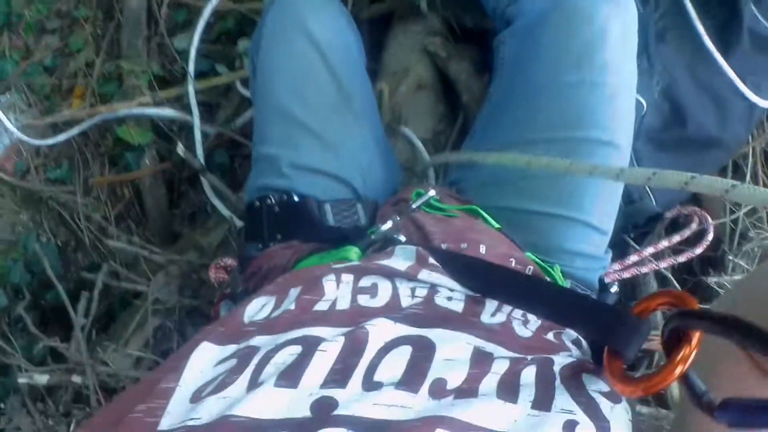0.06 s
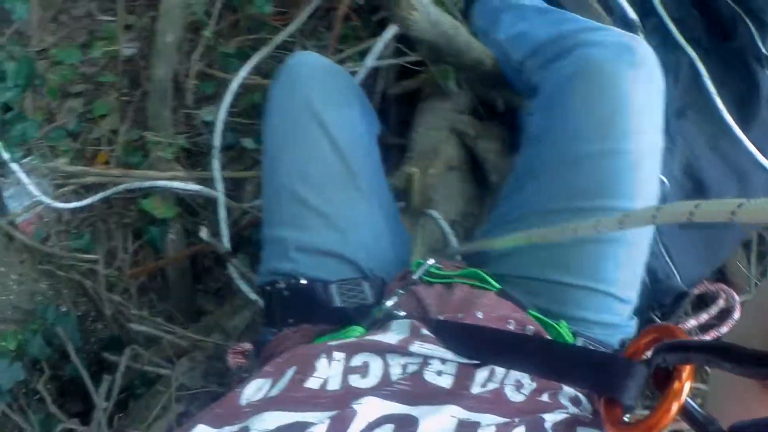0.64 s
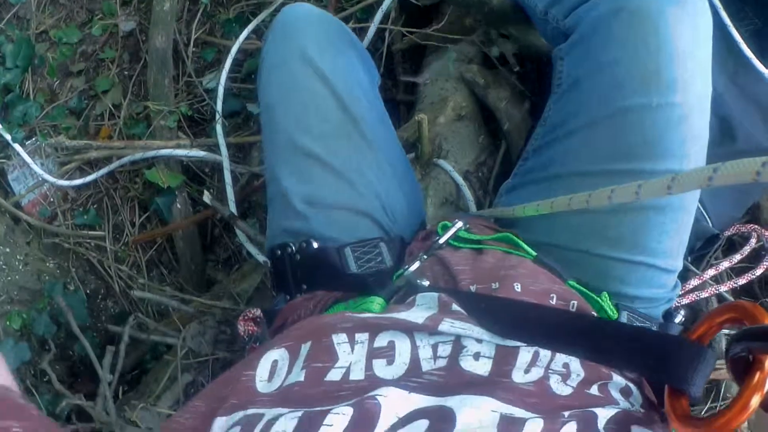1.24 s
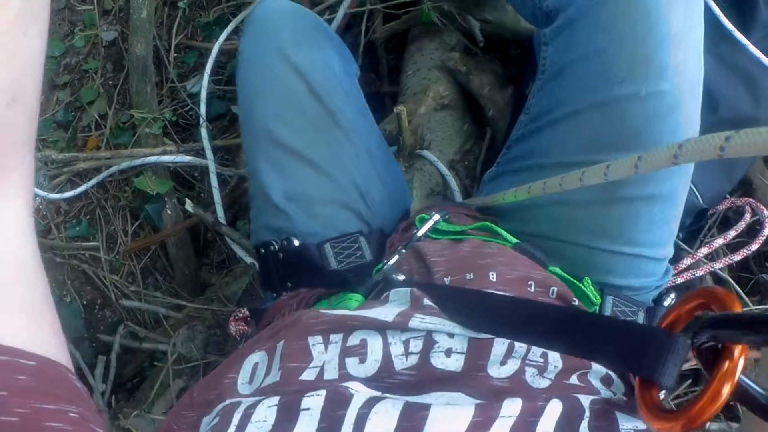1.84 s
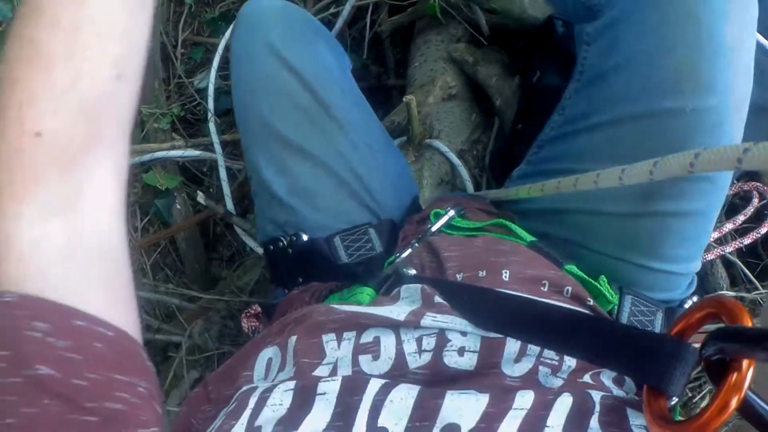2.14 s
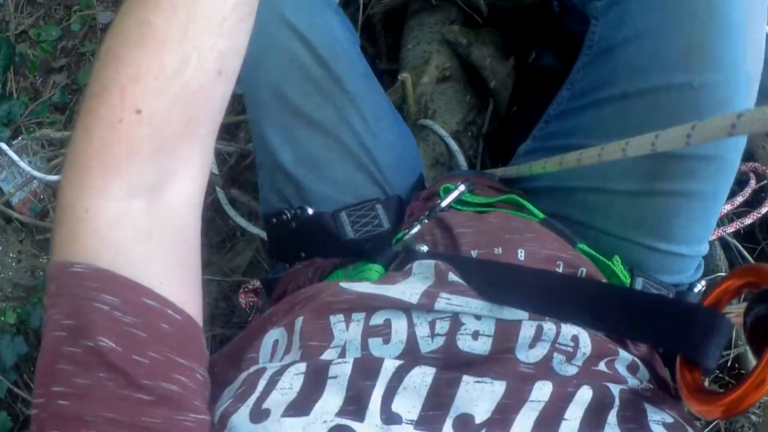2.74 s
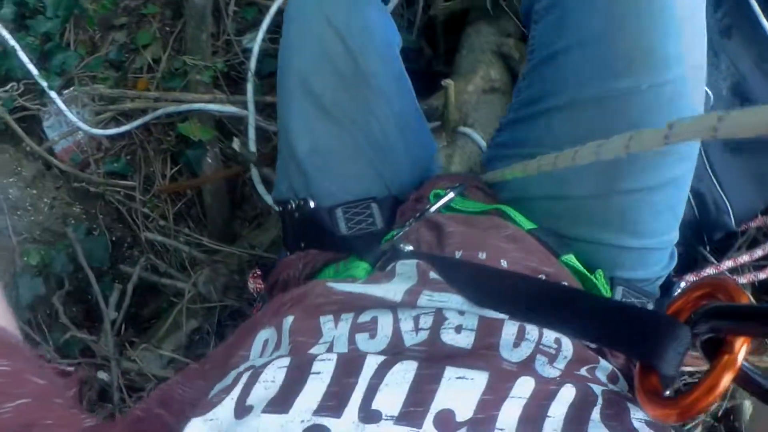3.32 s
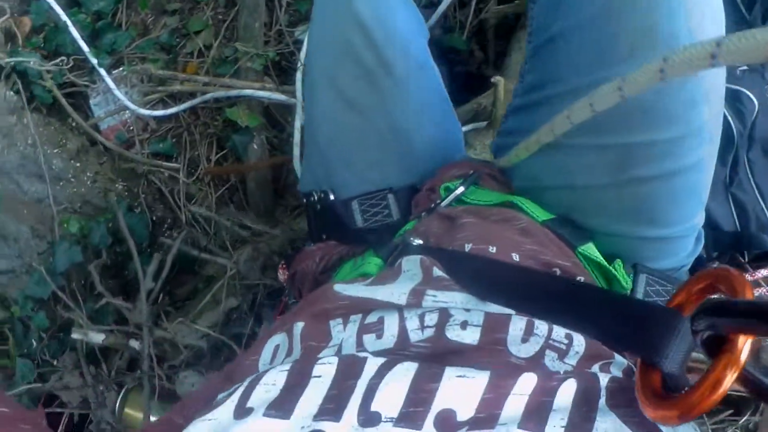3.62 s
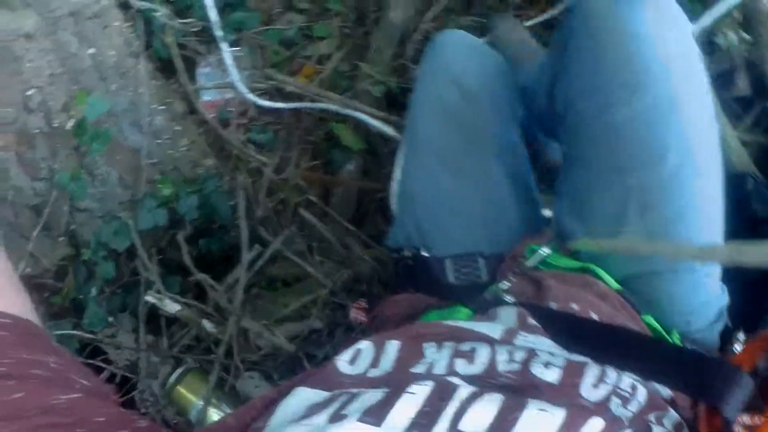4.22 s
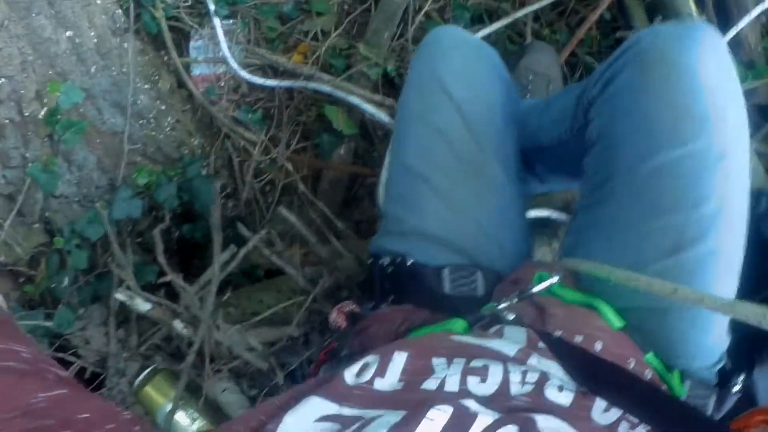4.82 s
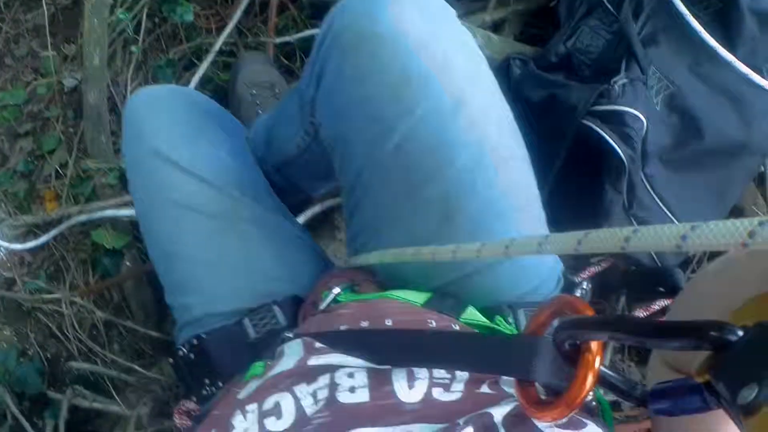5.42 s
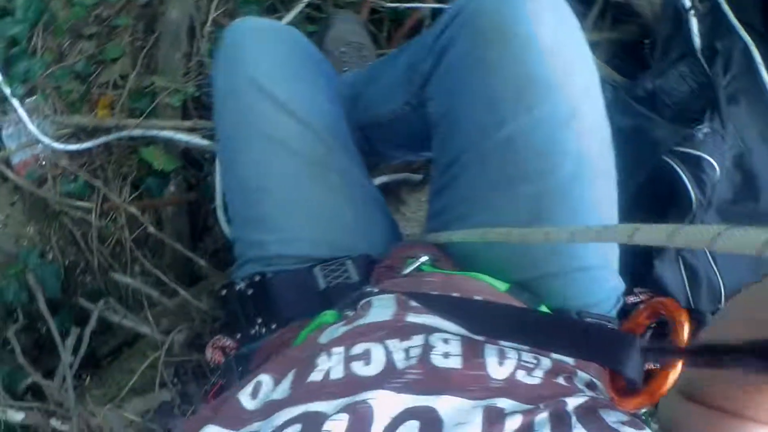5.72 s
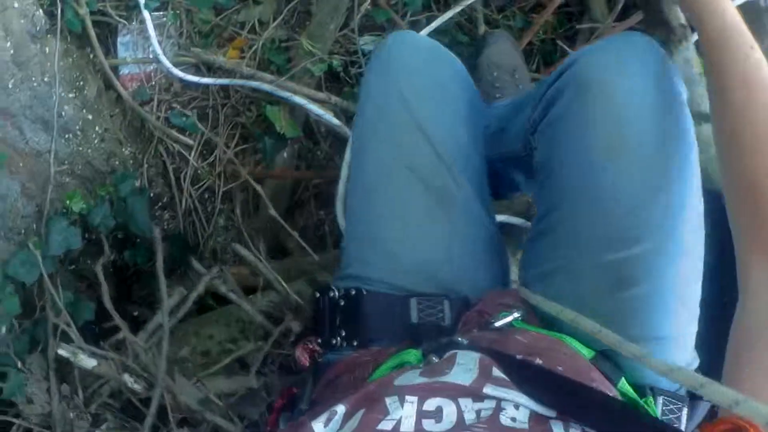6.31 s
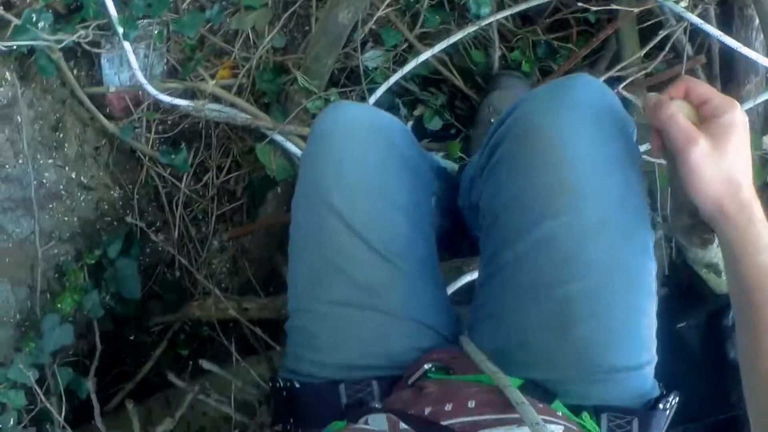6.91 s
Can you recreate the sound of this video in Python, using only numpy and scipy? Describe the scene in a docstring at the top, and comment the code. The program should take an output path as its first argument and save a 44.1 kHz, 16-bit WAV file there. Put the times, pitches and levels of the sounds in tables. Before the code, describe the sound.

Irregular rustling and rope scuffing with sharp metal clicks and hollow knocks, as a climber's gear bumps a body-worn microphone.

```python
"""Climber handling gear

A climber shifts about on a rope in a quiet wood, heard from a body-worn camera in a plastic case.
Each shift of weight sways the mount and rubs cloth. Karabiners click and ping, gear knocks, and rope
and webbing scuff and zip: impact and friction excite the damped modes of the case. Straps creak,
feet stir ivy and twigs, and the hardest knocks overload the microphone."""
import sys
import numpy as np
from scipy import signal
from scipy.fft import rfft, irfft
from scipy.io import wavfile
from scipy.ndimage import uniform_filter1d

SR = 44100
rng = np.random.default_rng(int(sys.argv[2]) if len(sys.argv) > 2 else 0)


def dump(signal):
    """Clip the signal to [-1, 1] and save it as 16-bit WAV at the path in sys.argv[1]."""
    limited = np.clip(np.atleast_2d(signal).T, -1, 1)
    pcm = np.round(limited * 32767).astype(np.int16)
    wavfile.write(sys.argv[1], SR, pcm)


N = 311346

# Levels in the tables are taken before each source's gain.
# modes of the camera case: frequency_hz, t60_s, level_db
CASE_MODES = [(78.5, 0.046, -8.5), (162.7, 0.086, -6.5), (256, 0.052, 2.5), (324.3, 0.086, -7),
              (439.6, 0.1, -15), (610, 0.025, -10), (787.6, 0.054, -2.5), (1144, 0.029, 0),
              (1277.5, 0.082, 5), (1359, 0.04, 5.5), (1548.6, 0.038, 12.5), (1665, 0.09, -13.5),
              (1892, 0.044, -1.5), (2135, 0.028, -1.5), (2350, 0.029, -6.5), (2670, 0.044, -17),
              (3120, 0.0091, -3), (3423, 0.012, 1.5), (3706, 0.051, -9), (4228, 0.015, 10),
              (4300, 0.09, -29), (4700, 0.03, 4), (5200, .02, -31), (6160, 0.0206, -26), (6800, 0.0033, 3),
              (7350, 0.0067, 3)]
# registers of the case (thud, shell ring, edge, glint): low_hz, high_hz
REGISTERS = [(55, 665), (800, 1820), (2100, 3350), (5200, 8900)]
# spectrum of the microphone's noise: frequency_hz, relative_density_db
NOISE_SPECTRUM = [(15, -27), (25, 7), (86, -2), (148, -8.5), (274, -6.5), (378, -10), (509, -9),
                  (1020, -17), (1270, -5.5), (1570, -25), (1950, -20.5), (5140, -25.5), (10400, -28),
                  (15500, -31.5)]
# shifts of the climber's weight: start_s, length_s, cloth_db, sway_db
WEIGHT_SHIFTS = [(0, 0.063, -42.5, -35), (0.165, 0.49, -40, -36), (.68, 0.1, -50, -37.5),
                 (1.11, 0.55, -43.5, -40.5), (1.702, 0.074, -53, -40), (2.05, 0.32, -42.5, -32.5),
                 (2.458, 0.16, -38, -31), (2.76, 0.12, -44, -37.5), (3.021, 0.042, -40.5, -38),
                 (3.265, .28, -42.5, -31.5), (3.76, .17, -34.5, -29), (4.016, .13, -36.5, -31),
                 (4.364, 0.34, -35, -26), (4.716, .23, -40.5, -38), (5.074, .16, -35.5, -25.5),
                 (5.27, 0.48, -45.5, -41.5), (6.099, 0.071, -40, -33), (6.67, 0.2, -46, -47.5)]
# spectrum of the swaying mount: frequency_hz, relative_density_db
SWAY_SPECTRUM = [(15, -43), (25, -4.5), (70, 4.5), (199, 0.5), (300, 3), (375, -12.5), (498, -3.5),
                 (584, -22), (764, -14.5), (881, -9), (1100, -48.5), (1430, -28), (2420, -120)]
# spectrum of rubbing cloth: frequency_hz, relative_density_db
CLOTH_SPECTRUM = [(240, -31), (400, -2), (1040, -9.5), (1600, 1.5), (1990, -13), (2380, -8.5), (2720, -18),
                  (7000, -36), (9100, -64), (15400, -120)]
# the body bumping the mount, and the low thud under the gear knock at 3.82 s: start_s, sway_db, thud_db
BUMPS = [(0.049, -30.5, -33), (.208, -15, -23.5), (.24, -22, -26), (0.312, -25, -19), (.984, -56, -36),
         (2.017, -53, -32), (2.177, -31.5, -28), (3.414, -30, -21), (3.824, -50, -18.5), (4.111, -24, -28),
         (4.34, -27, -20), (4.59, -22, -22.5), (5.19, -21, -25.5), (6.722, -41, -35.5), (6.957, -45, -36.5)]
# karabiners and buckles clicking: start_s, level_db, brightness_db, chatter_s
CLICKS = [(0.063, -34, -12, 0.0027), (0.153, -58.5, 25.5, .004), (0.27, -23.5, 12.5, 0.0036),
          (.31, -18, 8, 0.0052), (.322, -20.5, 4, .007), (.333, -16.5, 6, 0.0073),
          (.352, -19.5, 0.5, 0.011), (.372, -25.5, 3.5, 0.0062), (0.579, -25, 2.5, 0.0041),
          (0.904, -22, -8.5, 0.0013), (2.499, -24, 0.5, 0.0052), (3.411, -20.5, 0, 0.0075),
          (5.082, -27, 16.5, 0.0068), (5.138, -15, -9.5, 0.0058), (5.27, -24.5, -8.5, 0.0044),
          (5.33, -33, -7, .005), (5.821, -40, 1.5, 0.0022), (5.882, -49.5, 2, 0.003),
          (5.947, -45, 4.5, 0.0039), (6.031, -24, 8, 0.0087), (6.594, -53.5, 17, 0.0025)]
# tone of a click, a row per register: offset_db, db_per_brightness_db
CLICK_TONE = [(-7.5, 0.5), (0, 0), (-3, 0.5666), (-22, 1.5041)]
# rope and webbing scuffing: start_s, level_db, brightness_db, second_slip_delay_s (0 for none)
SCUFFS = [(.172, -23.5, -4.5, 0.027), (.339, -22, 11, 0.00013), (0.386, -20, 4.5, 0.00029),
          (.434, -23.5, 6.5, 0), (.536, -31, 18, 0), (.591, -21.5, 3, 0.0055), (.778, -36, -6, 0),
          (1.184, -27.5, -1, .028), (1.622, -31.5, -0.5, 0), (1.885, -43.5, -14, 0.0004),
          (2.172, -28.5, 1.5, 0.025), (2.336, -22, 3, 0.016), (2.646, -30.5, -0.5, 0),
          (2.765, -21, -7.5, 0.014), (2.992, -36, -18, 0), (3.049, -31.5, -4, 0.00052),
          (3.188, -43, 7.5, 0), (3.278, -34, -8, 0.0019), (3.347, -37, -7, 0), (3.509, -24.5, 3, .018),
          (3.984, -25.5, 0.5, 0), (4.104, -29.5, -9, 0.0023), (4.378, -29, 2.5, 0), (4.586, -31, 3, 0),
          (4.73, -21, 5, .041), (4.962, -34, -1.5, 0), (5.045, -26, 6.5, 0.00091),
          (5.092, -17, -7.5, 0.011), (5.163, -23.5, -8, 0.011), (5.391, -36.5, 0, 0), (5.592, -49, 13, 0),
          (5.718, -39.5, 6, 0), (6.1, -23, -17, 0.022), (6.335, -29, -1.5, 0.025)]
# tone of a slip, a row per register: offset_db, db_per_brightness_db
SLIP_TONE = [(-6.5, -0.21), (0, 0), (-10.5, 1), (-32, 0.5)]
# struck karabiners ringing: start_s, pitch_hz, level_db
PINGS = [(0.269, 7950, -36), (0.322, 7880, -33), (0.906, 4280, -41), (3.411, 4164, -27),
         (5.083, 7040, -27.5), (5.165, 4200, -40), (6.032, 7060, -26)]
# feet stirring ivy and dry twigs: start_s, level_db, time_constant_s
RUSTLES = [(.315, -55, 0.017), (5.086, -42, 0.042), (6.481, -52, 0.01), (6.633, -45.5, 0.011),
           (6.661, -54, 0.079)]
# longer pulls of rope over cloth: start_s, length_s, level_db, brightness_db
DRAGS = [(0.477, .1, -26, 4), (1.108, 0.25, -39.5, -14), (1.173, .09, -30.5, 2.5), (2.552, 0.12, -35, -7),
         (2.807, 0.13, -38.5, -3.5), (4.402, .18, -27.5, -2), (4.706, 0.041, -27.5, 6.5),
         (5.115, 0.089, -25, -1)]
# gear hitting the case: start_s, sway_db, thud_db, ring_db, edge_db, glint_db, chatter_s, hardness_hz
KNOCKS = [(2.724, -29, -11.5, -6.5, -19, -36, 0.0084, 3000),
          (3.8229, -36, -15, -15.5, -27.5, -46, 0.016, 400), (4.0322, -11.5, 2, -21, -34, -61, 0.0051, 197),
          (4.181, -6.5, -0.5, -11.5, -25.5, -40, 0.0065, 300),
          (5.646, -51, -22, -24, -14.5, -37, 0.00078, 1497),
          (6.0734, -24, -9.5, -2.5, -2, -35, 0.0046, 5000), (6.084, -25, -15.5, -6, -36, -42, 0.0044, 3010)]
# the rope's woven sheath running through the gear: start_s, length_s, top_pitch_hz, level_db
ZIPS = [(3.628, 0.33, 544, -37), (4.32, 0.31, 821, -41), (4.718, 0.29, 797, -42)]
# webbing creaking under load: start_s, length_s, pitch_hz, level_db
CREAKS = [(4.319, 0.029, 366, -29), (4.586, 0.032, 775, -26), (6.529, 0.01, 500, -40.5)]

T = np.arange(int(.25 * SR)) / SR  # seconds since the start of one contact
LEAD_S = .005  # a brief noisy swell just before each click or knock


def undb(db):
    """Amplitude grows tenfold with every 20 dB."""
    return 10 ** (np.asarray(db) / 20)


def unit(x):
    """Division by the rms gives a signal unit power."""
    return x / np.sqrt(np.mean(x ** 2))


def burst_level(x, db):
    """A transient's level is set as the rms of its strongest 20 ms."""
    power = uniform_filter1d(x ** 2, SR // 50, mode="constant")
    return x * undb(db) / np.sqrt(power.max())


def band(x, lo_hz, hi_hz, order=3):
    """A causal band-pass attenuates frequencies beyond its two edges."""
    return signal.sosfilt(signal.butter(order, [lo_hz, hi_hz], "band", fs=SR, output="sos"), x)


def colour(x, spectrum):
    """Spectral weighting colours a noise; the result has unit power."""
    hz, db = np.transpose(spectrum)
    bin_hz = np.maximum(np.arange(N // 2 + 1) * SR / N, 1)
    gain = undb(np.interp(np.log(bin_hz), np.log(hz), db))
    return unit(irfft(rfft(x) * gain, N))


def wander(rate_hz):
    """Smoothed random steps form a slow fluctuation of unit power."""
    hold = int(SR / rate_hz)
    steps = rng.standard_normal(N // 100)[:N // hold + 1]
    return unit(uniform_filter1d(np.repeat(steps, hold), hold)[:N])


def add(out, start_s, x):
    """Superposition: x adds to the sound already present."""
    i = max(int(start_s * SR), 0)
    out[i:i + len(x)] += x[:max(N - i, 0)]


def grit(n, spread_db):
    """Friction is a run of tiny slips, mostly small and a few large."""
    size = np.clip(rng.standard_normal(n), -3, 3)
    return unit(rng.standard_normal(n) * undb(spread_db * size))


def case_ring(detune, crack_db=3, crack_s=0.0034):
    """The case's impulse response: damped modes, shifted by where it is touched, and a dense crack."""
    hz, t60_s, db = np.transpose(CASE_MODES)[:, :, None]
    hz = hz * (1 + detune * rng.standard_normal(hz.shape))
    polarity = rng.choice([-1, 1], hz.shape)
    modes = polarity * undb(db - 60 * T / t60_s) * np.sin(2 * np.pi * hz * T)
    crack = undb(crack_db) * np.exp(-T / crack_s) * rng.standard_normal(len(T))
    return modes.sum(axis=0) + crack


def contact(force, levels_db, detune):
    """Forced response: the force is convolved with the case's ring, then each register gets its level."""
    response = signal.fftconvolve(force, case_ring(detune))[:len(T)]
    return sum(burst_level(band(response, lo, hi), db) for (lo, hi), db in zip(REGISTERS, levels_db))


def register_levels(tone, db, bright_db):
    """Spectral balance: brightness raises edge and glint against the shell ring."""
    offset_db, slope = np.transpose(tone)
    return db + offset_db + slope * bright_db


def impact_force(chatter_s, impulse, swell_s=0.0014):
    """After a brief noisy swell, colliding parts exchange an impulse at LEAD_S and chatter to rest."""
    age_s = T - LEAD_S
    time_constant_s = np.where(age_s < 0, swell_s, chatter_s)
    force = grit(len(T), 3.96) * np.exp(-np.abs(age_s) / time_constant_s)
    force[int(LEAD_S * SR)] += impulse
    return force


def microphone_noise(hiss_db=-46, whine_hz=10200, whine_db=-71):
    """Self-noise is stationary: a broadband murmur and hiss, with a faint narrowband whine."""
    whine = unit(band(rng.standard_normal(N), whine_hz - 250, whine_hz + 250, order=1))
    hiss = colour(rng.standard_normal(N), NOISE_SPECTRUM)
    return hiss * undb(hiss_db) + whine * undb(whine_db)


def shift_envelopes(attack_s=0.05, cloth_release_s=0.03, sway_release_s=0.076):
    """Each shift of weight builds, holds and decays exponentially; the mount outlasts the cloth."""
    t = np.arange(N) / SR
    rubbing, swaying = undb(-53), undb(-60)  # at rest
    for start_s, length_s, cloth_db, sway_db in WEIGHT_SHIFTS:
        onset = np.exp(-np.maximum(start_s - t, 0) / attack_s)
        after_s = np.maximum(t - start_s - length_s, 0)
        rubbing = np.maximum(rubbing, undb(cloth_db) * onset * np.exp(-after_s / cloth_release_s))
        swaying = np.maximum(swaying, undb(sway_db) * onset * np.exp(-after_s / sway_release_s))
    return rubbing, swaying


def sway_and_cloth(sway_gain_db=-2, patchy_db=4, band_drift_db=2):
    """Uneven grip modulates the amplitude of the mount's rumble and the cloth's fine crackle."""
    rubbing, swaying = shift_envelopes()
    grip = undb(patchy_db * wander(rate_hz=60))
    sway = colour(grit(N, spread_db=5.4) * grip, SWAY_SPECTRUM)
    # coarse folds and fine fibres rub separately, so each band swells and fades by itself
    edges_hz = np.geomspace(400, 6400, 5)
    cloth = 0
    for lo, hi in zip(edges_hz, edges_hz[1:]):
        rub = colour(grit(N, spread_db=9) * grip, CLOTH_SPECTRUM)
        cloth += band(rub, lo, hi, order=2) * undb(band_drift_db * wander(rate_hz=14))
    return sway * swaying * undb(sway_gain_db) + unit(cloth) * rubbing


def mount_swing(db, hz=80, t60_s=0.13):
    """Pushed once, the case on its mount moves as a damped oscillator."""
    return burst_level(undb(-60 * T / t60_s) * np.sin(2 * np.pi * hz * T), db)


def body_bumps(gain_db=-1):
    """A soft push swings the mount and excites only the low modes of the case."""
    out = np.zeros(N)
    for start_s, sway_db, thud_db in BUMPS:
        thud = burst_level(band(case_ring(detune=0.203), 162, 422), thud_db)
        add(out, start_s, mount_swing(sway_db) + thud)
    return out * undb(gain_db)


def karabiner_clicks(gain_db=-1):
    """Loaded metal snaps into place, damped by the rope; so brief a force excites a wide band."""
    out = np.zeros(N)
    for start_s, db, bright_db, chatter_s in CLICKS:
        force = impact_force(chatter_s, impulse=1.7, swell_s=0.0011)
        levels_db = register_levels(CLICK_TONE, db, bright_db)
        add(out, start_s - LEAD_S, contact(force, levels_db, detune=0.0527))
    return out * undb(gain_db)


def strap_scuffs(gain_db=-1, swell_s=0.0046, second_slip_db=-3.5):
    """Stick-slip friction swells and dies; a strap that catches again slips more weakly."""
    out = np.zeros(N)
    age = T / swell_s
    for start_s, db, bright_db, delay_s in SCUFFS:
        slips = [(start_s, db)]
        if delay_s > 0:
            slips.append((start_s + delay_s, db + second_slip_db))
        for slip_s, slip_db in slips:
            force = grit(len(T), spread_db=4) * age * np.exp(-age)
            levels_db = register_levels(SLIP_TONE, slip_db, bright_db)
            add(out, slip_s, contact(force, levels_db, detune=0.022))
    return out * undb(gain_db)


def karabiner_pings(t60_s=0.01, attack_s=0.00045):
    """One mode of the struck metal rings, heavily damped by hand and sling."""
    out = np.zeros(N)
    envelope = undb(-60 * T / t60_s) * (1 - np.exp(-T / attack_s))
    for start_s, hz, db in PINGS:
        add(out, start_s, burst_level(envelope * np.sin(2 * np.pi * hz * T), db))
    return out


def ivy_rustles():
    """Airborne sound: the crackle of ivy and twigs arrives without ringing the case."""
    out = np.zeros(N)
    for start_s, db, time_constant_s in RUSTLES:
        age = T / time_constant_s
        crackle = band(grit(len(T), spread_db=7), 2800, 11300, order=2)
        add(out, start_s, burst_level(crackle * np.sqrt(age) * np.exp(-age), db))
    return out


def rope_drags():
    """Sliding friction drives the case with a run of slips that swells and eases off."""
    out = np.zeros(N)
    for start_s, length_s, db, bright_db in DRAGS:
        force = grit(len(T), spread_db=8) * np.sin(np.pi * np.minimum(T / length_s, 1))
        levels_db = register_levels(SLIP_TONE, db, bright_db)
        add(out, start_s, contact(force, levels_db, detune=0.038))
    return out


def gear_knocks():
    """Impacts of heavy gear ring the case and swing the mount; padding low-passes the force."""
    out = np.zeros(N)
    for start_s, sway_db, *levels_db, chatter_s, hardness_hz in KNOCKS:
        padding = signal.butter(1, hardness_hz, fs=SR)
        force = signal.lfilter(*padding, impact_force(chatter_s, impulse=4.4))
        add(out, start_s - LEAD_S, contact(force, levels_db, detune=0.027))
        add(out, start_s, mount_swing(sway_db))
    return out


def rope_zips(pitch_sag=.1, weave_jitter=0.027):
    """Ribs of the sheath tick on the gear; their rate, heard as pitch, arches with the pull's speed."""
    out = np.zeros(N)
    for start_s, length_s, top_hz, db in ZIPS:
        speed = np.sin(np.linspace(0, np.pi, int(length_s * SR)))
        jitter = weave_jitter * wander(rate_hz=300)[:len(speed)]
        hz = top_hz * (1 - pitch_sag * (1 - speed) + jitter)
        ribs_passed = np.floor(np.cumsum(hz) / SR)
        ticks = np.diff(ribs_passed, prepend=0) * np.sqrt(np.abs(speed))
        response = signal.fftconvolve(ticks, case_ring(detune=0.0097))
        add(out, start_s, burst_level(band(response, 440, 1820), db))
    return out


def webbing_creaks(band_ratio=1.031):
    """Nearly periodic stick-slip gathers a strap's sound into a narrow band."""
    out = np.zeros(N)
    for start_s, length_s, hz, db in CREAKS:
        force = grit(len(T), spread_db=5.4) * np.sin(np.pi * np.minimum(T / length_s, 1))
        creak = band(force, hz / band_ratio, hz * band_ratio, order=1)
        add(out, start_s, burst_level(creak, db))
    return out


def scene():
    """Impacts, friction and rustling superpose at the microphone in one channel."""
    impacts = body_bumps() + karabiner_clicks() + karabiner_pings() + gear_knocks()
    friction = sway_and_cloth() + strap_scuffs() + rope_drags() + rope_zips() + webbing_creaks()
    return (impacts + friction + ivy_rustles())[None]


def record(dry, ceiling=.69, dull_hz=8600, treble_leak=0.089, top_hz=15700):
    """Saturation flattens the peaks; the sound is dull, with little treble above dull_hz, over hiss."""
    oversampled = signal.resample_poly(dry, 2, 1, axis=1)
    clipped = signal.resample_poly(np.clip(oversampled, -ceiling, ceiling), 1, 2, axis=1)
    dull = signal.sosfiltfilt(signal.butter(8, dull_hz, fs=SR, output="sos"), clipped)
    heard = dull + treble_leak * (clipped - dull) + microphone_noise()
    return signal.sosfilt(signal.ellip(10, .2, 80, top_hz, fs=SR, output="sos"), heard)


dry = scene()
out = record(dry)
dump(out)
```